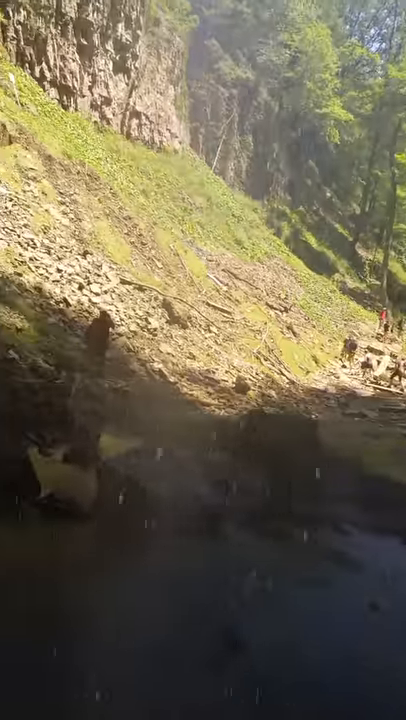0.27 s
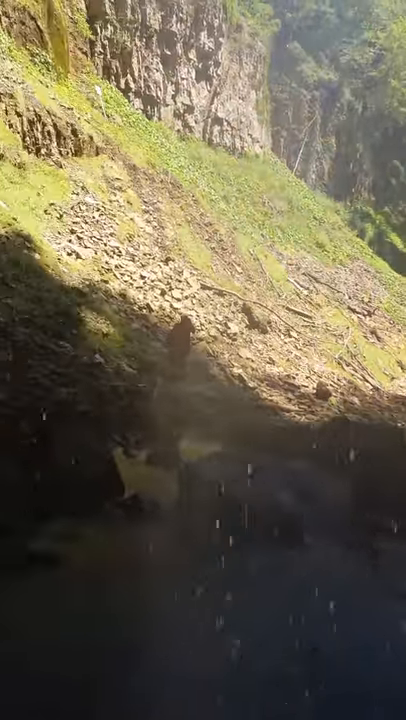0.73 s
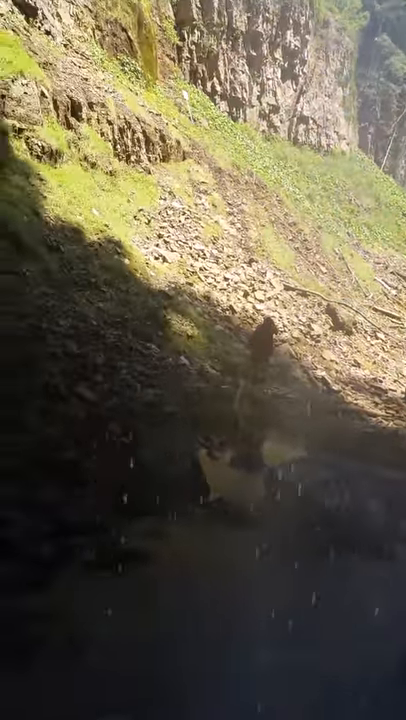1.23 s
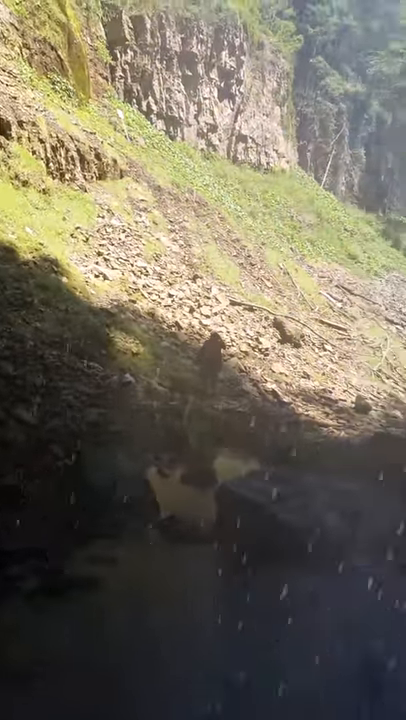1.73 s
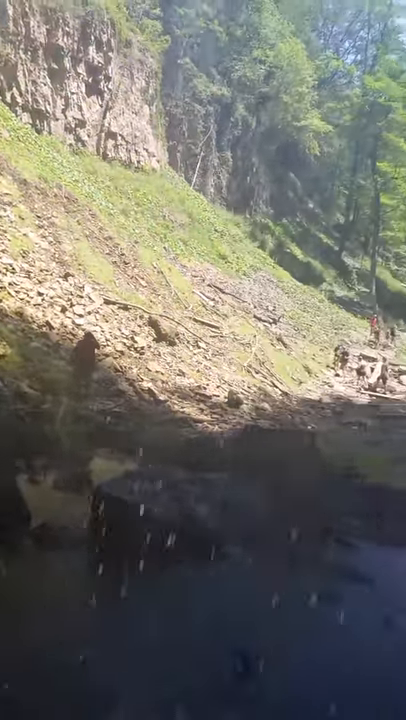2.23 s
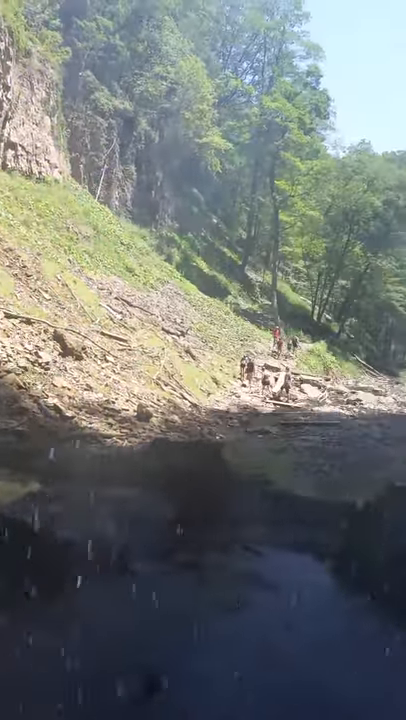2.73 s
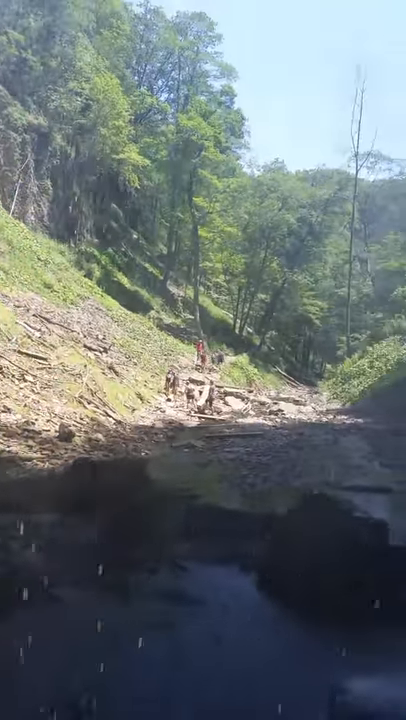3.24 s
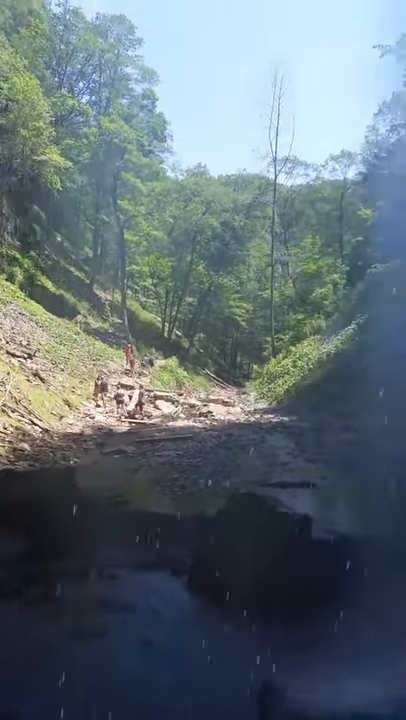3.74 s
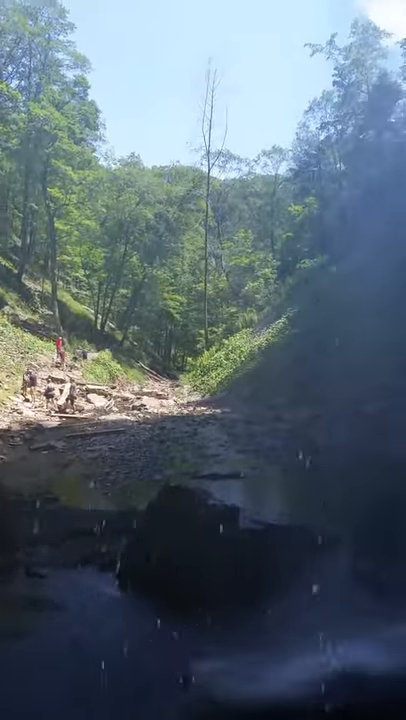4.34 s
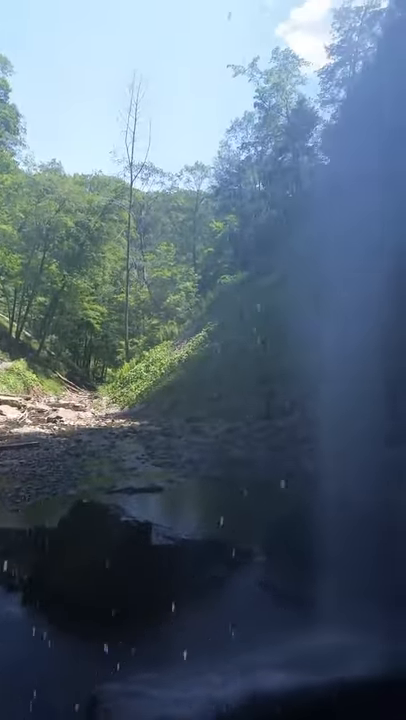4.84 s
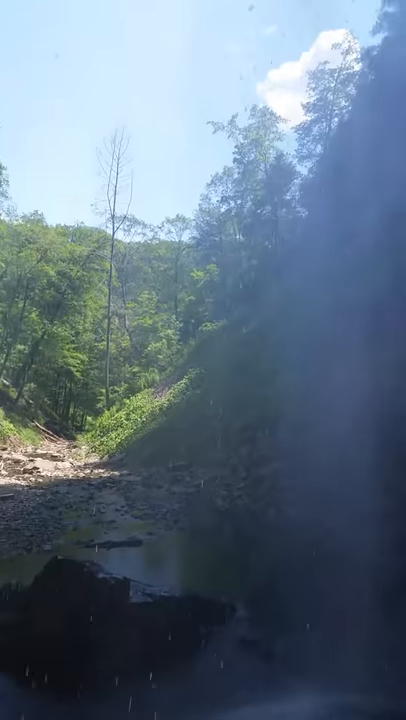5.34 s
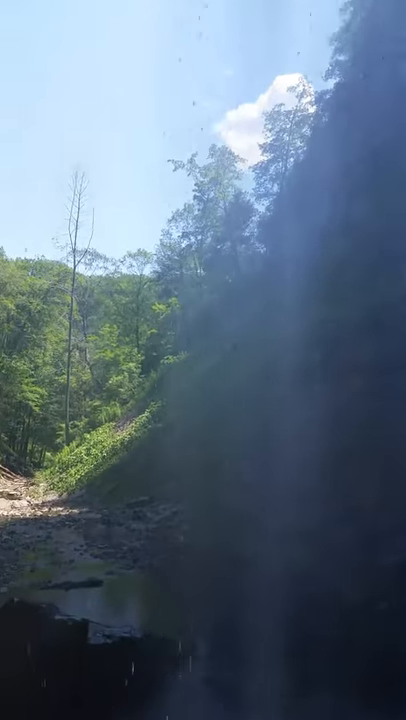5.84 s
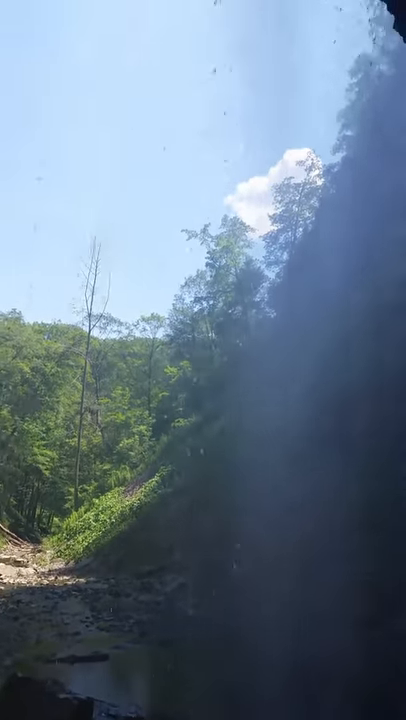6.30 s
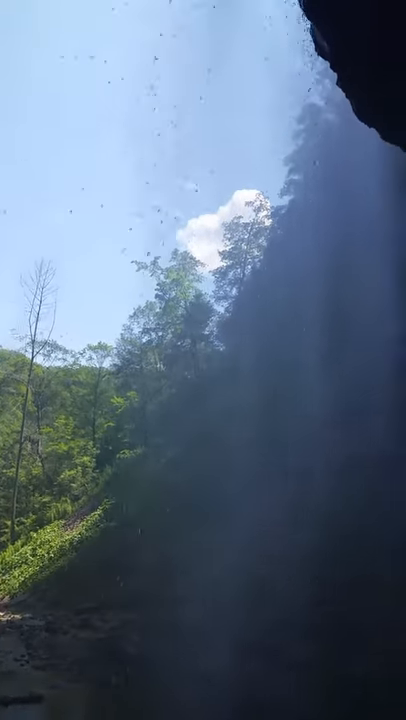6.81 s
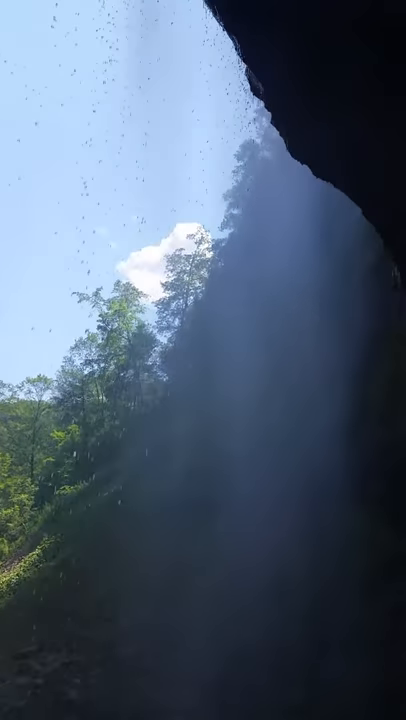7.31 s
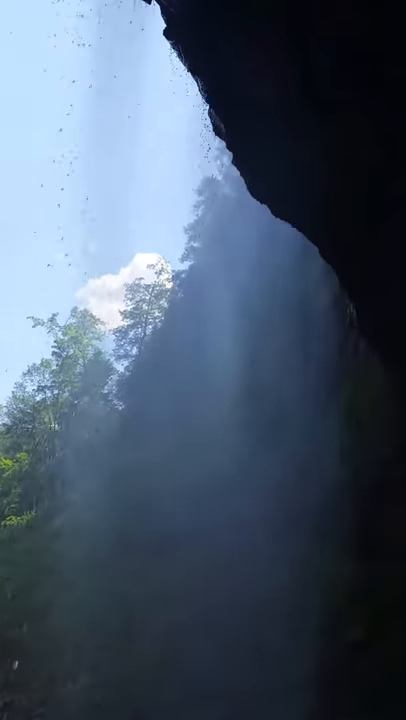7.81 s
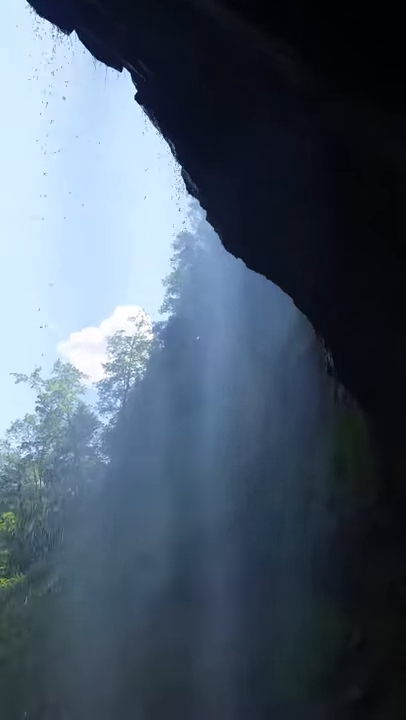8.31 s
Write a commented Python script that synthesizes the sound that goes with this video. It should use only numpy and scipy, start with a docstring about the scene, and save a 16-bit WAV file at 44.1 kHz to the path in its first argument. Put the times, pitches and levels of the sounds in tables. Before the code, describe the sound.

Dense, crisp water hiss fills a rock hollow while damp gusts rumble and thud irregularly against the microphone, mostly on the right.

```python
"""In the rock hollow behind a tall waterfall: countless drops burst on stone and pool in a bright, steady hiss.
The hiss is shaped noise with random ticks, partly direct and partly scattered by the rock.
The water drags air along; this draught, lumpy low-pitched noise, rumbles on the ports, mostly the right one.
Big eddies thump there as single pressure swings with a short flutter and rasp.
The hardest thumps make the camera's limiter duck the hiss for a moment."""
import sys
import numpy as np
from scipy import signal
from scipy.fft import rfft, irfft, next_fast_len
from scipy.io import wavfile
from scipy.ndimage import uniform_filter1d, minimum_filter1d, map_coordinates

SR = 44100
rng = np.random.default_rng(int(sys.argv[2]) if len(sys.argv) > 2 else 0)


def log_audio(samples):
    """Write samples as a 16-bit WAV file to the path given in sys.argv[1]."""
    # one column per channel
    frames = np.atleast_2d(samples).T
    # limit to full scale, then quantise
    limited = np.clip(frames, -1, 1)
    pcm = np.round(limited * 32767).astype(np.int16)
    wavfile.write(sys.argv[1], SR, pcm)


N = 377496


def amp(db):
    """Decibels to amplitude gain."""
    return 10 ** (np.asarray(db) / 20)


def unit(x):
    """x scaled to rms 1."""
    return x / np.sqrt(np.mean(x ** 2) + 1e-20)


def along(points, hz):
    """(Hz, value) points interpolated on a log frequency axis."""
    point_hz, values = np.transpose(points)
    return np.interp(np.log(hz + 1), np.log(point_hz + 1), values)


def curves(rows):
    """One value per sample for each column after the time in seconds."""
    knot_s, *columns = np.transpose(rows)
    t = np.arange(N) / SR
    return [np.interp(t, knot_s, column) for column in columns]


def wobble(knots_per_s):
    """Smooth random curve: a spline through normal random knots."""
    knots = rng.standard_normal(int(N * knots_per_s / SR) + 4)
    return map_coordinates(knots, [np.arange(N) * knots_per_s / SR])


def filtered(x, response):
    """x with its spectrum multiplied by response(Hz)."""
    padded = next_fast_len(N + 8192)
    hz = np.fft.rfftfreq(padded, 1 / SR)
    return irfft(rfft(x, padded) * response(hz), padded)[..., :N]


def coloured(x, spectrum):
    """x shaped by (Hz, dB) points, at rms 1."""
    return unit(filtered(x, lambda hz: amp(along(spectrum, hz))))


def splashes(patchy_db, drops_per_s, drops_db):
    """Far drops merge into a patchy white wash; nearer drops tick on top, drops_db relative to it."""
    z = signal.stft(rng.standard_normal(N), nperseg=512)[2]
    field = uniform_filter1d(rng.standard_normal(z.shape), size=14, axis=0)  # across frequency
    field = uniform_filter1d(field, size=9, axis=1)  # across time
    wash = signal.istft(z * amp(patchy_db * unit(field)), nperseg=512)[1][:N]
    drop_here = rng.random(N) < drops_per_s / SR
    ticks = drop_here * rng.standard_normal(N)
    return unit(unit(wash) + amp(drops_db) * unit(ticks))


# Falling water. Each row: time in seconds, hiss level in dB before sheets and trim.
FALL_LEVEL = [(0, -19.4), (.7, -22), (1.2, -19), (3.45, -18.5), (3.9, -17), (4.55, -18), (4.8, -21),
              (5.5, -18.5), (5.65, -21.8), (5.95, -18), (6.8, -16.5), (8.12, -17), (8.26, -21.5),
              (8.5, -20)]
# How squarely the right port faces the spray. Each row: time in seconds, gain of the finest spray in dB.
SPRAY_FACING = [(0, .5), (1.6, 4), (3.9, -1.7), (6.7, -1.3), (8.5, 0.2)]
# Camera turns. Each row: time in seconds, left port lag in ms, left hiss against right in dB before spray gain.
CAMERA_TURN = [(0, .24, -5.5), (3, 0.29, -5.5), (5, 0.27, -6), (8.5, 0.39, -4)]
# Sound straight from the foot of the fall. Each row: frequency in Hz, share of the power from 0 to 1.
DIRECT_SHARE = [(300, 0.08), (1000, 0.33), (1550, 0.55), (2000, 0.44), (2600, 0.1), (6000, 0), (12000, 0)]
# Hiss spectrum at each port. Each row: frequency in Hz, relative density in dB per Hz.
HISS_LEFT = [(400, -17.8), (700, -15.2), (1200, -12.5), (2000, -11.4), (3200, -11.6), (4500, -12.9),
             (5700, -15.4), (7000, -12.1), (8000, -10.4), (9000, -4.2), (10000, -0.2), (12000, 0.0),
             (13200, -3.5), (15700, -7.5)]
HISS_RIGHT = [(600, -20.9), (900, -17.3), (1400, -14.3), (2000, -11.3), (3000, -8.7), (4500, -4.8),
              (6500, -2.4), (7400, -6.6), (8200, -8.0), (9200, -2.5), (10100, 0.0), (12000, -6.4),
              (14100, -2.1), (15700, -7.7)]


def waterfall():
    """Direct hiss reaches the right port first; the rock hollow scatters the rest from all sides."""
    hiss_db, = curves(FALL_LEVEL)
    spray_db, = curves(SPRAY_FACING)
    lag_ms, left_db = curves(CAMERA_TURN)
    direct, *scattered = [splashes(patchy_db=1.0, drops_per_s=500, drops_db=-12.5) for _ in range(3)]
    late = map_coordinates(direct, [np.arange(N) - lag_ms * SR / 1000], order=3)

    def direct_share(hz):
        """Share of the power that comes straight from the fall."""
        return np.clip(along(DIRECT_SHARE, hz), 0, 1)

    straight = filtered([late, direct], lambda hz: np.sqrt(direct_share(hz)))
    diffuse = filtered(scattered, lambda hz: np.sqrt(1 - direct_share(hz)))
    left, right = straight + diffuse
    left = coloured(left, HISS_LEFT)
    right = coloured(right, HISS_RIGHT)
    # the shortest waves depend on how the right port faces the spray
    spray = filtered(right, lambda hz: np.clip((hz - 11000) / 2000, 0, 1))
    right = right + (amp(spray_db) - 1) * spray
    # the water lands in uneven sheets
    sheets_db = 0.1 * wobble(11) + 0.22 * wobble(32)
    trim_db = 0.55
    return amp(hiss_db + sheets_db + trim_db) * np.array([amp(left_db) * left, right])


def eddies(spectrum, lumps_db):
    """Turbulent pressure that swells with each passing lump of air, near rms 1 in the long run."""
    swell = amp(lumps_db) * np.ones(N)
    usual = np.sqrt(np.abs(uniform_filter1d(swell ** 2, size=SR // 3)) + 1e-9)
    return coloured(rng.standard_normal(N), spectrum) * swell / usual


# Gusts on the right port.
# Each row: hold start in seconds, hold in seconds, rumble in dB, flutter in dB before trim.
GUSTS = [(0.215, 0.034, -16, -24.5), (0.346, 0.093, -19.5, -22), (0.462, .2, -20, -26),
         (0.695, 0.43, -18.5, -25.5), (0.993, .05, -16.5, -25.5), (1.196, 0.028, -19, -29),
         (2.043, .1, -22.5, -29.5), (2.173, 0.092, -16, -22.5), (2.353, 0.23, -22.5, -37.5),
         (2.662, 0.38, -20.5, -28), (3.332, 0.24, -22, -34.5), (3.693, 0.26, -26, -42),
         (4.016, 0.028, -20, -28), (4.12, 0.13, -22, -34.5), (4.253, .12, -25, -26.5),
         (4.615, 0.38, -19.5, -29), (4.697, 0.039, -14.5, -17.5), (5.03, .06, -24.5, -38.5),
         (5.347, 0.12, -27, -40), (5.719, 0.045, -24, -35), (6.319, 0.15, -20, -34),
         (6.577, 0.16, -20.5, -32.5), (6.878, 0.039, -10, -23), (6.994, 0.092, -20, -39),
         (7.195, 0.67, -19.5, -31.5), (7.56, .1, -13, -34), (8.123, 0.32, -17.5, -32),
         (8.233, 0.074, -19.5, -25.5)]
GUST_ATTACK_S, GUST_RELEASE_S = 0.014, 0.045  # time constants


def gust_power():
    """Rumble and flutter power: each gust rises quickly, holds, dies away; overlapping gusts add up."""
    t = np.arange(N) / SR
    power = np.zeros((2, N))
    for start_s, hold_s, rumble_db, flutter_db in GUSTS:
        before = np.maximum(0, start_s - t) / GUST_ATTACK_S
        after = np.maximum(0, t - start_s - hold_s) / GUST_RELEASE_S
        away = before + after
        near = away < 10
        envelope = np.exp(-away[near])
        power[:, near] += np.outer(amp([rumble_db, flutter_db]), envelope) ** 2
    return power


# Slow swings, faster swings and rasp of the draught. Each row: frequency in Hz, relative density in dB per Hz.
RUMBLE = [(10, -32), (30, -9.5), (65, -0.5), (120, -0.5), (180, -4.5), (270, -14), (450, -34.5), (900, -67),
          (2000, -120)]
FLUTTER = [(100, -37), (220, -3.5), (330, -1), (480, -6.5), (700, -14), (1100, -26), (1800, -47),
           (4000, -120)]
RASP = [(300, -31), (650, 3), (1000, -1.5), (1400, -7), (2000, -18.5), (3500, -47), (6000, -120)]
# Weaker draught on the sheltered left port. Each row: time in seconds, rumble in dB.
LEE = [(0, -38.5), (1.08, -26), (1.35, -41), (2, -46), (2.13, -31), (3, -41), (3.9, -40), (4.85, -34),
       (5.5, -48), (6.45, -39), (6.8, -30.5), (8.56, -36.5)]
CALM_RUMBLE_DB, CALM_FLUTTER_DB = -29.5, -47  # right port between gusts, flutter before trim


def draught():
    """Air tumbles over each port on its own; the faster it goes, the smaller and higher its eddies."""
    rumble_power, flutter_power = gust_power()
    rumble_db = 10 * np.log10(rumble_power + amp(CALM_RUMBLE_DB) ** 2)
    flutter_db = 10 * np.log10(flutter_power + amp(CALM_FLUTTER_DB) ** 2)
    # a weak draught arrives in separate lumps; in a strong gust they merge
    gaps = np.interp(flutter_db, [-45, -24], [1.8, .75])
    lumps = gaps * unit(np.tanh(0.78 * (wobble(55) + 1.15 * wobble(20))))
    rumble = amp(rumble_db) * eddies(RUMBLE, 2.42 * lumps)
    flutter_trim_db = 2.16
    flutter = amp(flutter_db + flutter_trim_db) * eddies(FLUTTER, 4.2 * lumps + 4.8 * wobble(200))
    # rasp grows faster than flutter, so it stands out in the strongest gusts, in short crackles
    rasp_db = -22.5 + 2.6 * (flutter_db + 20)
    rasp = amp(rasp_db) * eddies(RASP, 5 * lumps + 7.0 * wobble(260))
    lee_db, = curves(LEE)
    lee = amp(lee_db) * eddies(RUMBLE, 3 * wobble(18))
    return np.array([lee, rumble + flutter + rasp])


# Big eddies that strike the right port.
# Each row: time in seconds, peak of the pressure swing in dB, flutter in dB.
THUMPS = [(.112, -11.5, -29), (.236, -1, -13.5), (.371, -6, -14), (.694, -4, -13.5), (0.839, -4, -13),
          (0.932, -15, -15.5), (1.114, -9.5, -17.5), (1.218, -5, -19), (1.476, -25, -26),
          (2.265, -1, -13.5), (2.589, -13, -17), (2.865, -3, -24), (2.987, -1, -18), (3.419, -9.5, -25),
          (4.014, 1, -17.5), (4.052, -16, -17), (4.606, 1, -22), (4.859, -5, -13), (4.941, -2, -11),
          (5.051, -13, -27), (5.447, -18, -30), (6.03, -9.5, -28), (6.258, -10.5, -38), (6.41, -2.5, -17),
          (6.731, -9, -20.5), (7.185, -4.5, -21), (7.348, -8, -21.5), (7.556, 0.5, -26), (7.975, -2.5, -18),
          (8.24, 1, -20), (8.312, -22, -16)]


def thumps(swing_s, flutter_s, rasp_s, rasp_db, wake_s, wake_db):
    """A big eddy swings the pressure once, breaks into flutter that rasps when strong, and trails a wake."""
    t = np.arange(N) / SR
    flutter, rasp = eddies(FLUTTER, 0), eddies(RASP, 0)
    strongest_db = max(row[2] for row in THUMPS)
    port = np.zeros(N)
    draws = rng.standard_normal((len(THUMPS), 2))
    for (hit_s, swing_db, flutter_db), (size, sign) in zip(THUMPS, draws):
        near = slice(max(0, int((hit_s - .05) * SR)), int((hit_s + .12) * SR))
        since_s = t[near] - hit_s
        distance_s = np.abs(since_s)
        u = since_s / (swing_s * np.exp(0.28 * size))  # random width about swing_s
        swing = np.sign(sign) * (1 - 2 * u ** 2) * np.exp(-u ** 2)
        wake = amp(wake_db) * np.clip(since_s / flutter_s, 0, 1) * np.exp(-distance_s / wake_s)
        burst = (np.exp(-distance_s / flutter_s) + wake) * flutter[near]
        # relative to the flutter; weaker eddies rasp less
        crackle_db = rasp_db + .5 * (flutter_db - strongest_db)
        crackle = amp(crackle_db) * np.exp(-distance_s / rasp_s) * rasp[near]
        port[near] += amp(swing_db) * swing + amp(flutter_db) * (burst + crackle)
    return np.array([np.zeros(N), port])


def scene():
    """Water and the wind that it makes, as left and right ports."""
    eddy_hits = thumps(swing_s=0.0024, flutter_s=0.0053, rasp_s=0.0029, rasp_db=-2.0,
                       wake_s=0.014, wake_db=-9.5)
    return waterfall() + draught() + eddy_hits


def limiter(x, ceiling_db, attack_s, release_db_per_s):
    """One gain for both channels: drops quickly at peaks over the ceiling, recovers at a steady dB rate."""
    peak_db = 20 * np.log10(np.abs(x).max(axis=0) + 1e-9)
    over_db = np.maximum(0, peak_db - ceiling_db)
    recovery_db = release_db_per_s * np.arange(N) / SR
    needed = amp(recovery_db - np.maximum.accumulate(over_db + recovery_db))
    span = max(2, int(attack_s * SR))
    gain = uniform_filter1d(minimum_filter1d(needed, span), span)  # starts to fall ahead of the peak
    return x * gain


TOP_HZ = 15750


def record(dry):
    """The camera limits its peaks and keeps nothing above its band limit."""
    limited = limiter(dry, ceiling_db=-0.5, attack_s=0.011, release_db_per_s=70)
    return filtered(limited, lambda hz: hz < TOP_HZ)


dry = scene()
out = record(dry)
log_audio(out)
```